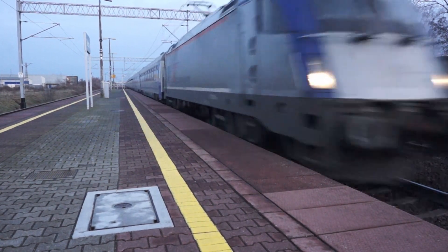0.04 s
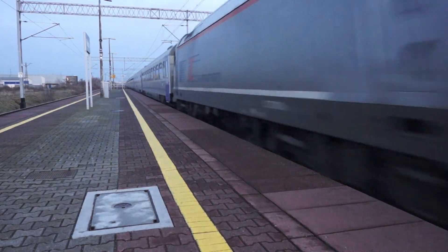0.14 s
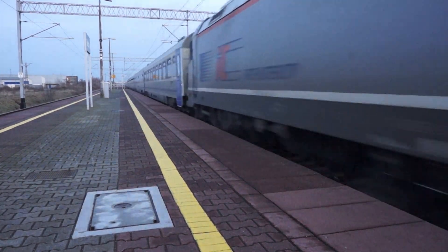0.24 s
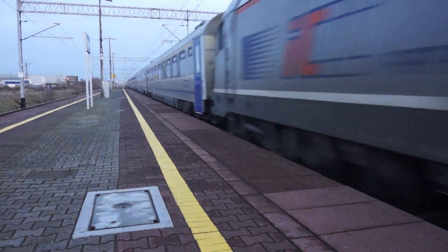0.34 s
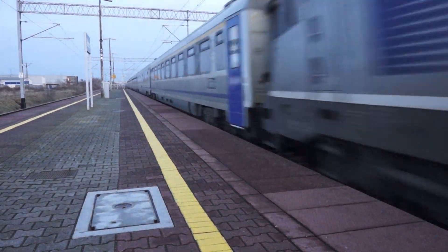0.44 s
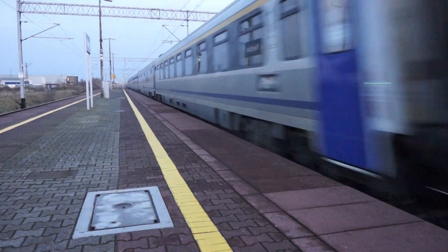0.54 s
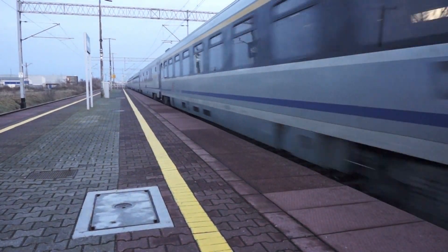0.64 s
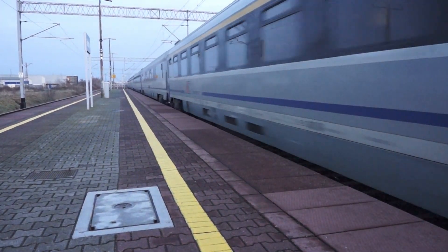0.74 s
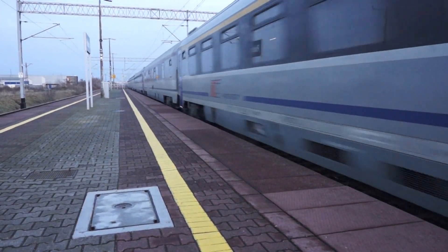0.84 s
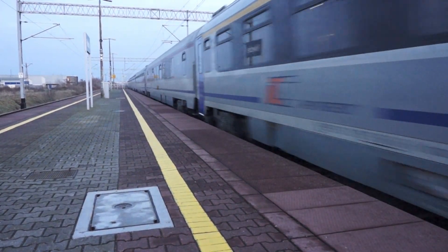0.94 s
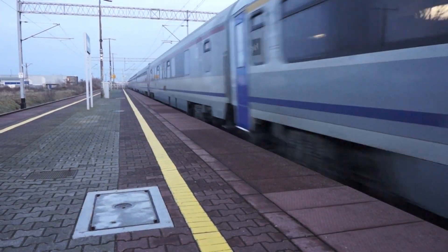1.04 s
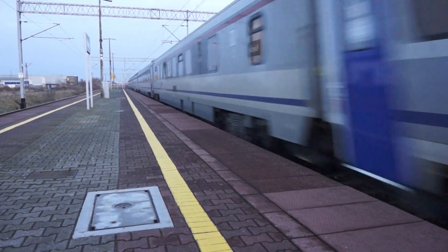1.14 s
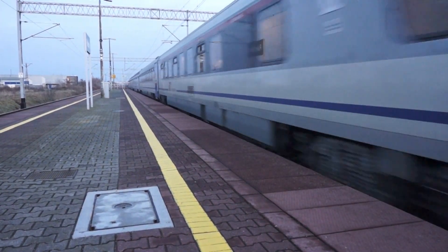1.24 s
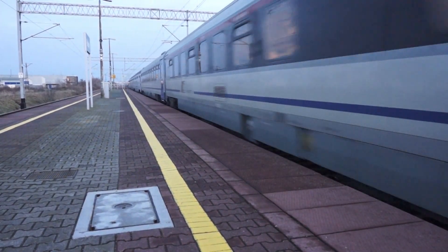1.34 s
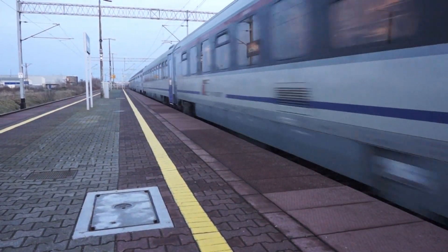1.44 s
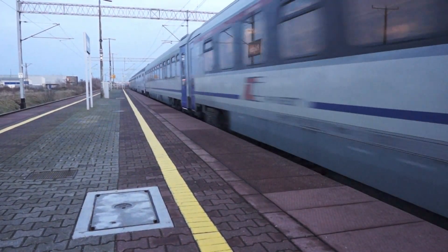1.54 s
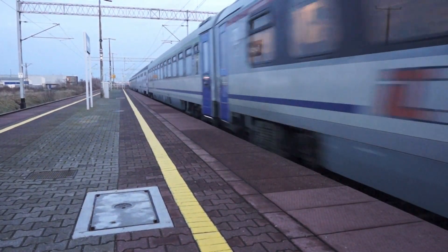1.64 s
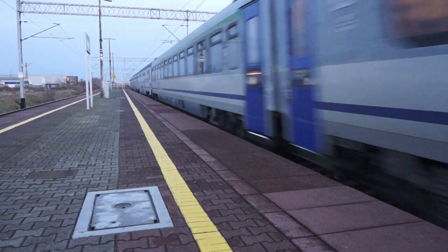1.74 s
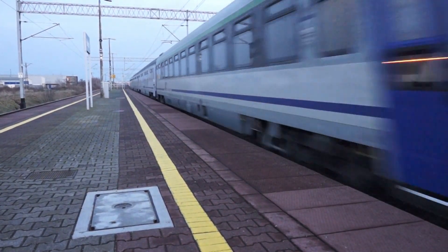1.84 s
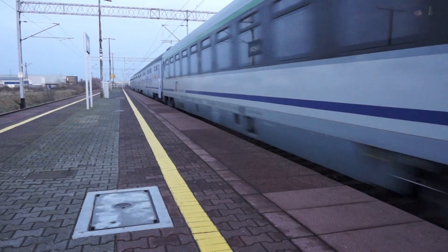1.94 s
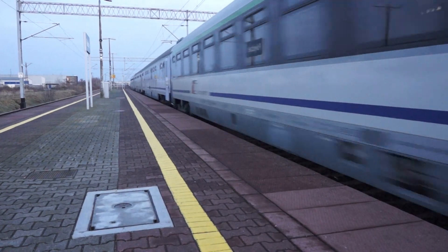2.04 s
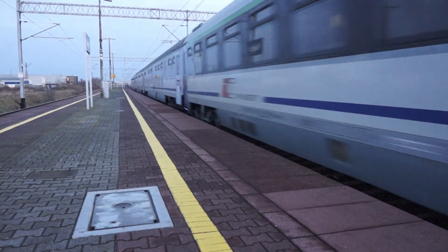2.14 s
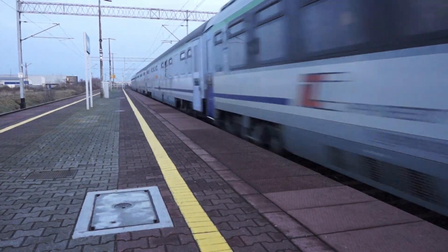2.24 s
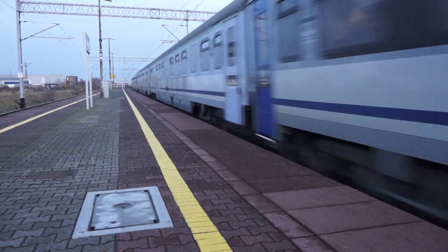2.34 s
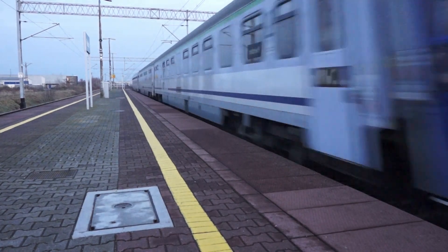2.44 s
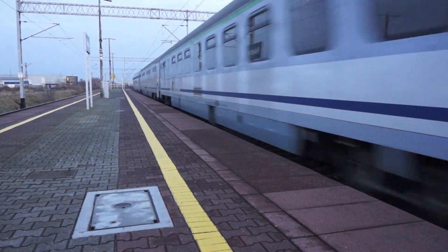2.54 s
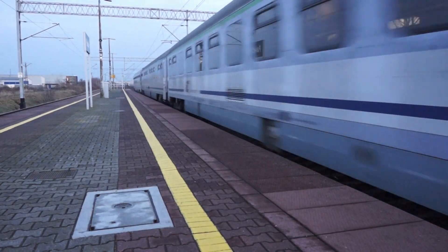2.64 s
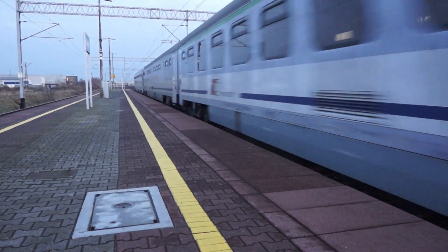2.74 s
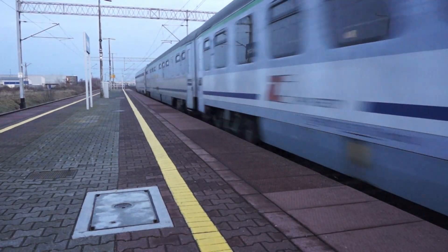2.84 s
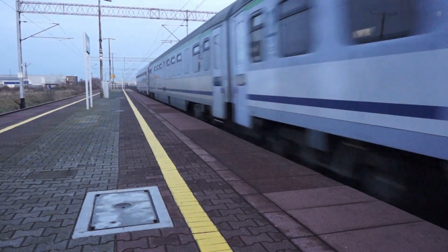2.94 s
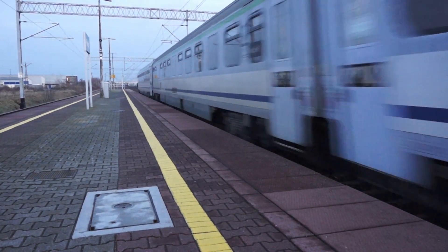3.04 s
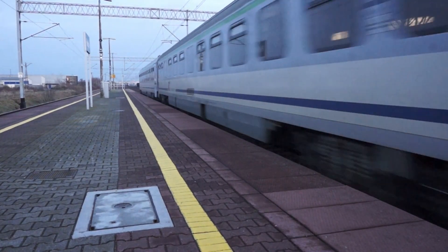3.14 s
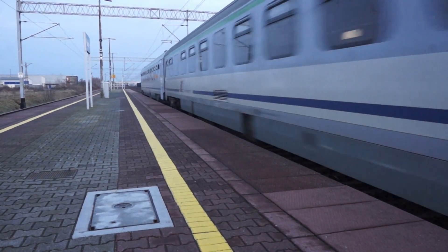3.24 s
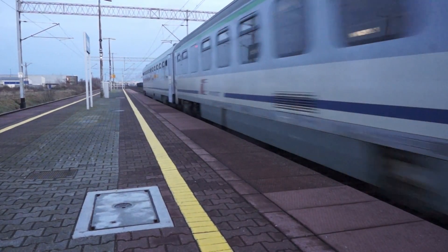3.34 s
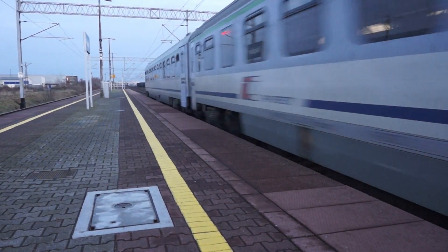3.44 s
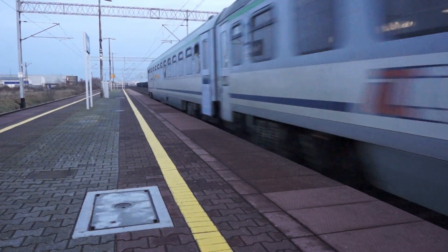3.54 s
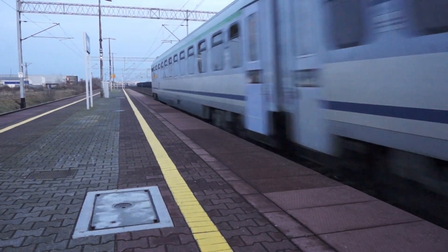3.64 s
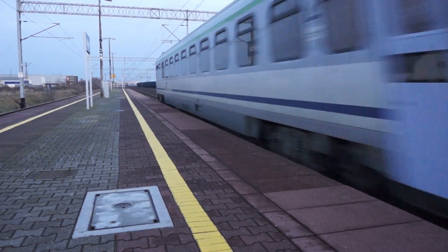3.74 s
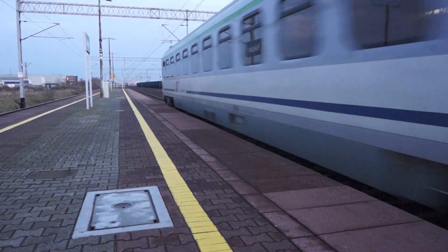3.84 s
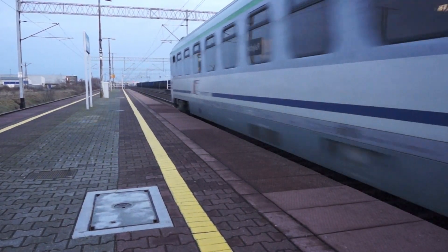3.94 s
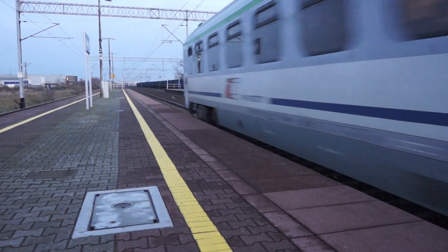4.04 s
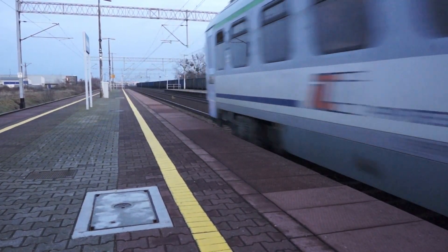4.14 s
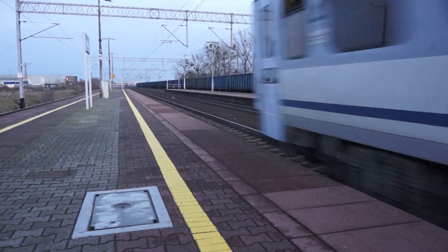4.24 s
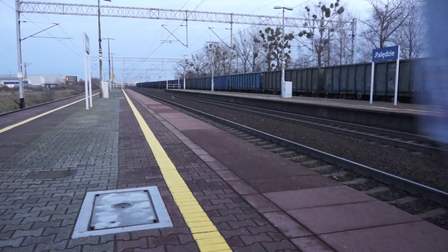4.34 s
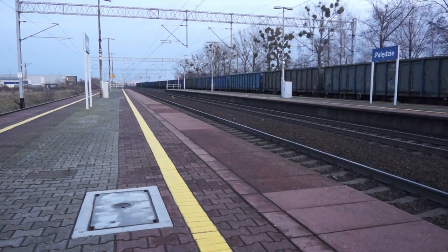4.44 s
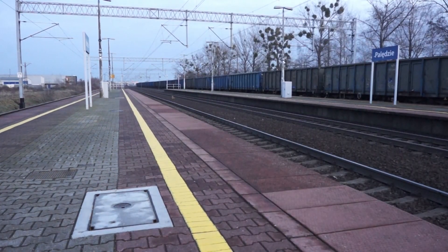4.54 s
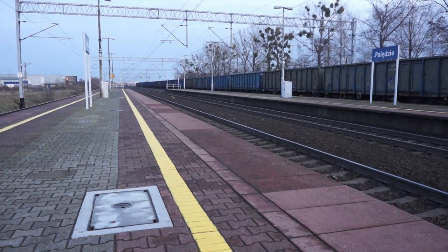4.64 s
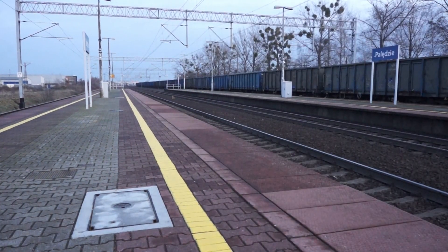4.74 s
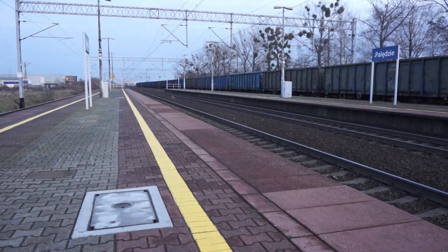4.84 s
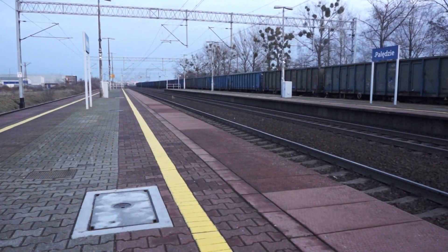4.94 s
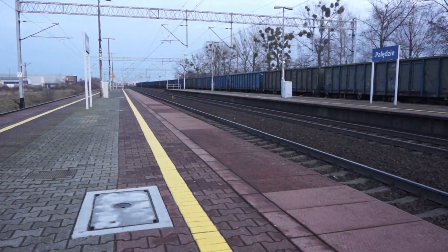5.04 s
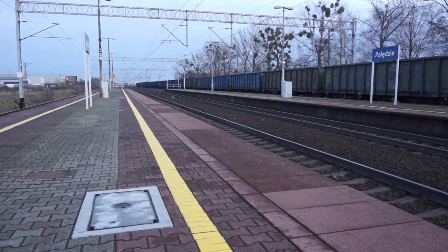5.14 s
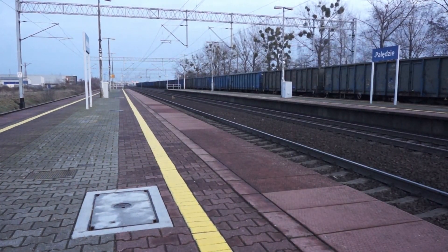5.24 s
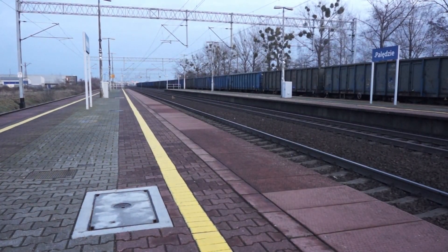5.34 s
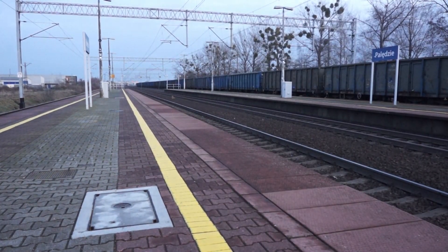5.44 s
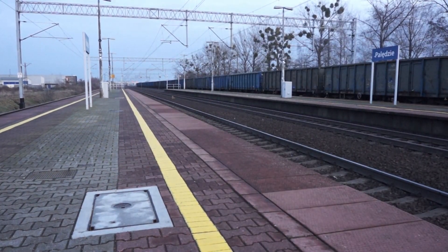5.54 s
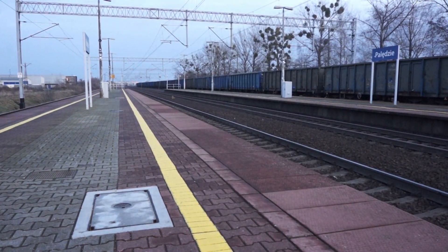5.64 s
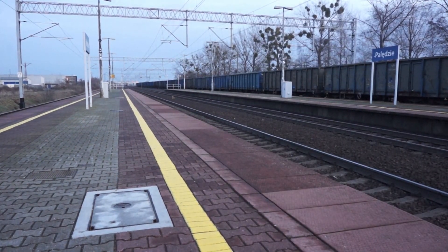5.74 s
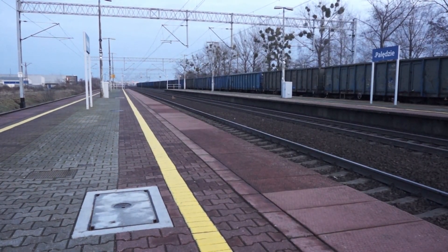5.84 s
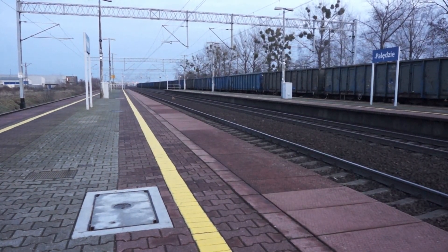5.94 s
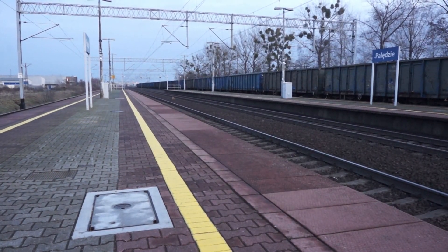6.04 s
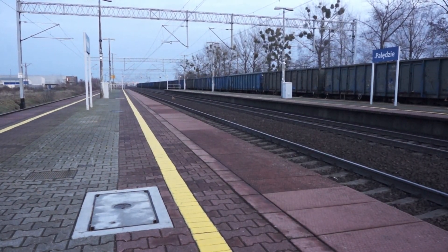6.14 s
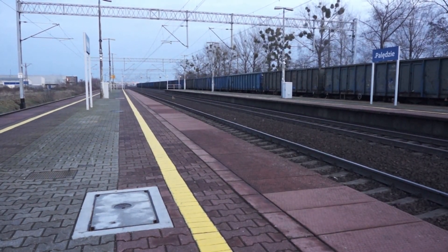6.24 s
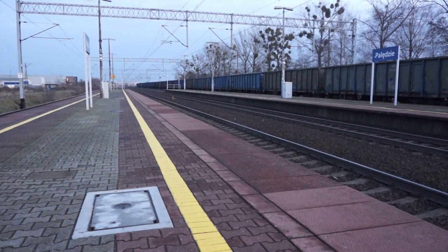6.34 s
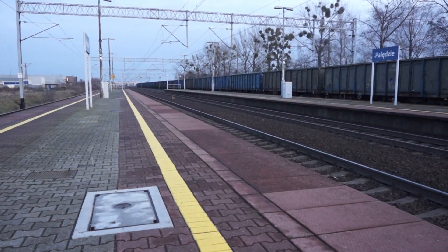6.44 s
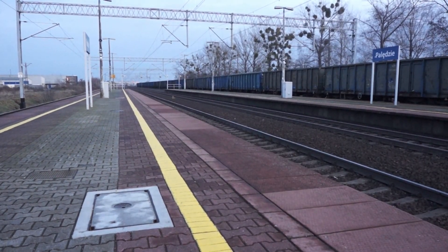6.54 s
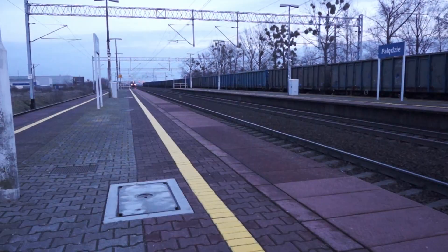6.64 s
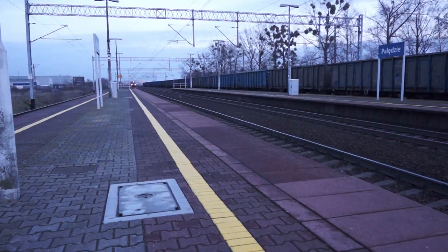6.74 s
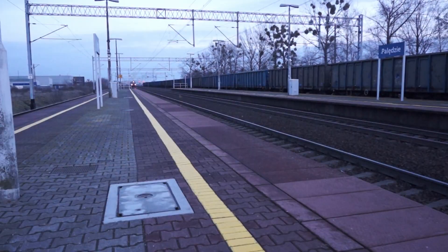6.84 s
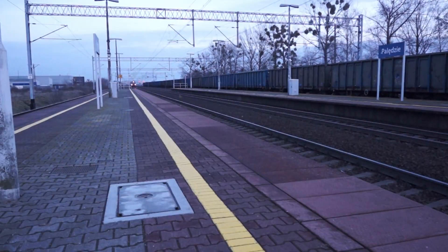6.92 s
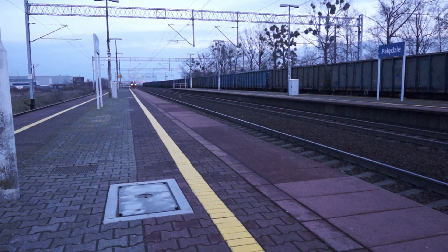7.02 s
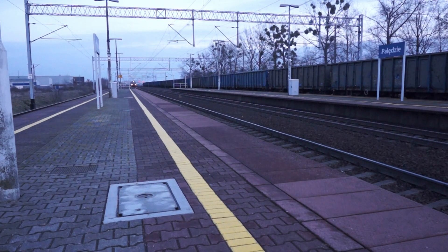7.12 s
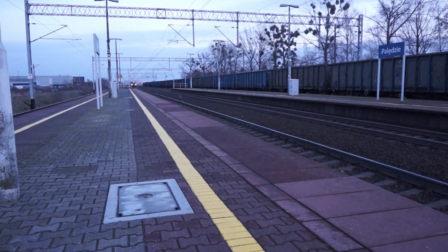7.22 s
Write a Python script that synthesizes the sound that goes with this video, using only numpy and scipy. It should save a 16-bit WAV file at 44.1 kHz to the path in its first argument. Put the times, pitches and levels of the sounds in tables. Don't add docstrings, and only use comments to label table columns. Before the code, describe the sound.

A fast electric passenger train passes very close, on the right of an open-air platform. At 0 seconds the locomotive is already abreast with heavy rumble and broad roar, easing slightly after half a second as the coaches follow. Until about 4.4 seconds the rolling noise surges with each pair of bogies, with hard knocks over rail joints, bright hiss and rough metallic wheel ringing whose pitch drops as it passes; clatter is strongest around 3.1. At 4.5 the last coach clears and slipstream slams the microphone in fluttering thuds. The roar recedes and dulls while the rails sing thinly. Another strong, lumpy gust arrives around 6.3 to 6.4. Near 6.6 the sound dips briefly to silence, then a quiet platform appears: distant traffic wash, light rustling near 6.8 and 7.0, and a last soft low gust until 7.3.

```python
import sys
import numpy as np
from scipy import signal
from scipy.fft import rfft, irfft, next_fast_len
from scipy.io import wavfile

SR = 44100
rng = np.random.default_rng(int(sys.argv[2]) if len(sys.argv) > 2 else 0)


def log_audio(samples):
    frames = np.atleast_2d(samples).T
    limited = np.clip(frames, -1, 1)
    pcm = np.round(limited * 32767).astype(np.int16)
    wavfile.write(sys.argv[1], SR, pcm)


def natural_amplitude(level_db):
    exponent = np.asarray(level_db, float) / 20
    return 10 ** exponent


N = 321048
HZ = np.fft.rfftfreq(N, 1 / SR) + 1e-3
T = np.arange(N) / SR
STEPS = np.arange(0, N + 64, 64) / SR
SPEED_M_S = 42
TAIL_S, CUT_S = 4.5, 6.623


def rms_one(x):
    return x / np.sqrt(np.mean(x ** 2) + 1e-20)


def at_hz(points, hz):
    table_hz, values = np.transpose(points)
    return np.interp(np.log(hz), np.log(table_hz), values)


def drift(rate_hz, size):
    knots = rng.standard_normal(int(size / SR * 60) + 3)
    pole = np.exp(-2 * np.pi * rate_hz / 60)
    wander = rms_one(signal.lfilter([1], [1, -pole], knots))
    return np.interp(np.arange(size) * 60 / SR, np.arange(len(knots)), wander)


def resonate(x, hz, width_hz):
    r = np.exp(-np.pi * width_hz / SR)
    feedback = [1, -2 * r * np.cos(2 * np.pi * hz / SR), r * r]
    return signal.lfilter([(1 - r * r) / 2, 0, (r * r - 1) / 2], feedback, x)


def power_sum(*levels_db):
    power = sum(natural_amplitude(2 * np.asarray(db)) for db in levels_db)
    return 10 * np.log10(power + 1e-12)


def swells(rows):
    levels = []
    for s, db, rise_s, fall_s in rows:
        decay = np.maximum((s - STEPS) / abs(rise_s), (STEPS - s) / abs(fall_s))
        levels.append(db - 20 / np.log(10) * decay)
    return power_sum(*levels)


ZONES_HZ = [100, 450, 1300, 3800, 13000]


def wash(from_s, to_s, levels, colour, alike, balance, lead, patchy_db):
    start = int(from_s * SR)
    size = next_fast_len(int(to_s * SR) - start + 1)
    hz = np.fft.rfftfreq(size, 1 / SR) + 1e-3
    t = (start + np.arange(size)) / SR
    shared, apart = natural_amplitude(at_hz(colour, hz)) * rfft(rng.standard_normal((2, size)))
    likeness = np.clip(at_hz(alike, hz), 0, 1)
    half = natural_amplitude(at_hz(balance, hz) / 2) * np.exp(.5j * at_hz(lead, hz))
    mid = np.sqrt((1 + likeness) / 2) * shared
    side = np.sqrt((1 - likeness) / 2) * apart
    pair = np.array([(mid + side) * half, (mid - side) / half])

    power = 2 * abs(pair.mean(axis=0)) ** 2 / size ** 2
    zone_db = [10 * np.log10(power[(hz > a) & (hz < b)].sum()) for a, b in zip(ZONES_HZ, ZONES_HZ[1:])]
    steer = np.array([np.interp(t, STEPS, db) - own for db, own in zip(levels, zone_db)])
    centres = np.log(np.sqrt(np.multiply(ZONES_HZ[1:], ZONES_HZ[:-1])))
    together, total = drift(8, size), 0
    for octave in np.arange(5, 14.1, .5):
        window = np.cos(np.pi / 2 * np.clip(2 * (np.log2(hz) - octave), -1, 1)) ** 2
        shares = [np.interp(octave * np.log(2), centres, row) for row in np.eye(4)]
        flicker_db = patchy_db * min(1, (16 - octave) / 5) * (.6 * together + drift(9.0, size))
        total = total + natural_amplitude(shares @ steer + flicker_db) * irfft(pair * window, size)
    out = np.zeros((2, start + size + N))
    out[:, start:start + size] = total * (t < to_s)
    return out[:, :N]


# (frequency [Hz], likeness [0-1])
TRAIN_ALIKE = [(60, .9), (250, .93), (700, .96), (1030, .9), (1400, .68), (2070, .42), (2600, .25),
               (3100, .2), (4100, .37), (6200, .3), (9000, .52), (11700, .3), (13000, .05)]
# (frequency [Hz], left minus right [dB])
TRAIN_BALANCE = [(60, -27), (110, 8.5), (200, 0.5), (380, -1.0), (700, -2.5), (1290, -6), (2380, -7.5),
                 (4400, -4.5), (8120, -2.5), (15000, -3.5)]
# (frequency [Hz], left lead [rad])
TRAIN_LEAD = [(30, 0), (2750, 0), (3450, -1.8), (4130, -3.1), (5500, -4.3), (6900, -5.3), (9000, -5.9),
              (15600, -6.6)]


def from_track(x):
    half = natural_amplitude(at_hz(TRAIN_BALANCE, HZ) / 2) * np.exp(.5j * at_hz(TRAIN_LEAD, HZ))
    return irfft(rfft(x) * [half, 1 / half], N)


# (time [s], rail and sleepers [dB], wheel roar [dB], contact hiss [dB])
BOGIE_NOISE = [(0.01, -14.5, -16.5, -18), (0.22, -19, -43, -34), (0.44, -19.5, -19, -21.5),
               (0.57, -25.5, -20, -21.5), (0.68, -65, -23, -29), (0.86, -47, -23.5, -32.5),
               (1.18, -28, -18, -24.5), (1.38, -27, -16, -28), (1.83, -24.5, -16, -23),
               (2.05, -25, -18.5, -25.5), (2.41, -26, -18.5, -25.5), (2.66, -26.5, -23.5, -23.5),
               (3.07, -29.5, -19, -25.5), (3.28, -25.5, -18.5, -24), (3.69, -27.5, -19.5, -23),
               (3.86, -22, -16, -25), (4.02, -34, -27, -53), (4.35, -23, -21.5, -27)]
COMING_M = [4.64, 3.7, 3.56]
GOING_M = [5.1, 4.82, 3.63]
# (time [s], rail [dB], roar [dB])
JOINTS = [(1.16, -22, -16), (1.775, -23, -21), (1.99, -19, -18), (2.14, -21, -47), (2.355, -19, -28),
          (2.415, -21, -40), (2.997, -17, -24), (3.04, -32, -23), (3.135, -13.5, -14), (3.62, -18, -14),
          (3.94, -30, -18), (4.375, -16, -15.5)]
# (time [s], level [dB], rise [s], fall [s])
LOCOMOTIVE = [
    (0.02, -15.5, .1, 0.29),
    (.22, -15.5, 0.059, 0.055),
]
# (time [s], level [dB], rise [s], fall [s])
AIR_PUFFS = [
    (1.17, -35, .02, .05),
    (1.85, -32, 0.11, 0.087),
    (3.31, -32, 0.059, .04),
    (3.66, -31, .03, 0.25),
    (4.03, -26, .02, .07),
]


def rolling_db():
    along = SPEED_M_S * (STEPS - np.array(BOGIE_NOISE)[:, :1])
    rail, roar = [swells([(row[0], row[k], .006, .0077) for row in JOINTS]) for k in (1, 2)]
    knocks_db = (rail, roar, roar - 9)
    zones = []
    for db, coming, going, knocks in zip(np.transpose(BOGIE_NOISE)[1:], COMING_M, GOING_M, knocks_db):
        reach = np.where(along < 0, coming, going)
        loss_db = 10 * .55 * np.log10(1 + abs(along / reach) ** 4.39)
        zones.append(power_sum(knocks, *(db[:, None] - loss_db)))
    rumble = power_sum(zones[0] - 12.5, -38.5, swells(LOCOMOTIVE + AIR_PUFFS))
    return np.array([rumble, *zones]) - .9


def tail_share():
    return np.clip((T - TAIL_S - .015) / .035, 0, 1)


# (frequency [Hz], density [dB per Hz])
ROLLING_COLOUR = [(18, -70), (30, -48), (102, -23.5), (249, -6.5), (590, -4.5), (767, -2), (1200, -7),
                  (1640, -5), (3060, -9), (4530, -12.5), (5730, -11), (8710, -16), (11600, -31),
                  (13600, -46), (15500, -77)]


def passing_train():
    noise = wash(0, TAIL_S + .1, rolling_db(), ROLLING_COLOUR,
                 TRAIN_ALIKE, TRAIN_BALANCE, TRAIN_LEAD, patchy_db=1.6)
    return np.sqrt(1 - tail_share()) * natural_amplitude(-0.5) * noise


# (time [s], disc modes [dB], main ring [dB], rim modes [dB])
BOGIES = [(.58, -46, -33, -52), (.78, -44, -28, -35), (1.20, -48.5, -37, -33), (1.42, -42, -30.5, -37.5),
          (1.85, -47, -27.5, -31.5), (2.03, -28.5, -27.5, -36), (2.43, -29.5, -27, -34),
          (2.62, -39, -31, -55), (3.06, -27.5, -25.5, -34), (3.27, -43, -27, -35), (3.72, -40, -31, -36.5),
          (3.96, -48, -28.5, -37), (4.38, -36, -28, -48)]
# (frequency [Hz], width [Hz])
WHEEL_MODES = [
    (705, 110),
    (1730, 38),
    (2420, 50),
    (2900, 60),
    (3250, 70),
]


def wheels():
    track_m, axles_m, ports_m = 4.2, 2.5, .055
    size = SR * 7 // 10
    out = np.zeros((2, N + SR))
    span = (np.arange(size) - size // 2) / SR
    for s, disc_db, main_db, rim_db in BOGIES:
        mode_db = [disc_db, main_db, disc_db - 4, rim_db, rim_db + .5]
        for offset in (-axles_m / 2, axles_m / 2):
            noise = rng.standard_normal(size)
            detune = 1 + .009 * rng.standard_normal(5)
            ring = np.zeros(size)
            for db, (hz, width_hz), d in zip(mode_db, WHEEL_MODES, detune):
                mode = resonate(resonate(noise, hz * d, width_hz), hz * d, 3 * width_hz)
                ring += natural_amplitude(db + 2 + 1.8 * drift(12, size)) * rms_one(mode)
            along = SPEED_M_S * span + offset
            r = np.hypot(along, track_m)
            facing = np.clip(1.8 + along / 4, 0, 1)
            beamed = ring * facing * (track_m / r) ** .75 * np.hanning(size) ** .35
            at = round(s * SR) - size // 2
            for k, side in enumerate((.5, -.5)):
                path = r - track_m + side * ports_m * along / r
                out[k, at:at + size] += np.interp(span, span + path / 343, beamed)
    roar_db = np.interp(T, STEPS, rolling_db()[2])
    return out[:, :N] * natural_amplitude(.28 * (np.maximum(roar_db, -30) + 21))


# (frequency [Hz], width [Hz], onset [s], level [dB],
# fall [dB/s])
RAIL_SONG = [(810, 100, 4.72, -26, 48), (1602, 53, 4.5, -38.5, 8), (2040, 38, 1.9, -44, 1.5),
             (5280, 90, 5.2, -56, 7), (7590, 250, 4.7, -52, 2.5), (7800, 200, 2.8, -54, 4),
             (8250, 60, 3.2, -64, 8), (9660, 70, 4, -58, 3.3), (1363, 96, 6.67, -44, -4)]


def rail_song():
    t, out = T[T >= TAIL_S], np.zeros(N)
    noise = rng.standard_normal(len(t))
    for hz, width_hz, s, db, fall in RAIL_SONG:
        onset = np.clip((t - s) / 0.01, 0, 1) * ((t < CUT_S) | (s > CUT_S))
        ring = rms_one(resonate(resonate(noise, hz, width_hz), hz, 2 * width_hz))
        level_db = db - fall * np.maximum(t - s, 0) + 2.0 * drift(9.1, len(t))
        out[-len(t):] += onset * ring * natural_amplitude(level_db)
    return out


# (time [s], peak [dB], frequency [Hz], length [cycles])
BUFFETS = [(4.527, 1.5, 524, 0.63), (4.53, -3.5, 1180, 0.8), (4.553, -5, 426, 1.3), (4.579, -3.5, 387, 1.1),
           (4.605, -2.5, 576, 1), (4.669, -9, 824, 1.6), (4.694, -7, 470, 0.95), (5.942, -17, 401, 1),
           (6.04, -8, 450, 0.72), (6.301, -5, 336, 1.3), (6.319, -2, 485, 0.84), (6.335, -6, 434, 2.8),
           (6.345, -9, 280, 0.67), (6.353, -1, 735, 1.2), (6.361, 3, 690, 0.59), (6.371, -4, 570, 1),
           (6.39, -3.5, 444, 1.5), (6.396, 2, 1070, 2.2), (6.406, -2, 820, 0.48), (6.416, 1, 610, 0.9),
           (6.427, 0, 696, 0.79), (6.497, -12.5, 328, 0.67), (6.511, -14, 350, 0.72),
           (7.107, -11.5, 193, 1.4), (7.127, -12, 167, 0.77), (7.149, -14, 167, 0.85),
           (7.194, -16.5, 221, 1.14), (7.241, -11, 164, 0.83), (7.253, -4, 132, 0.91)]


def buffets():
    out = np.zeros((2, N))
    chances = rng.standard_normal((len(BUFFETS), 3))
    for (s, db, hz, cycles), (phase, skew, pan_db) in zip(BUFFETS, chances):
        age = np.arange(int(6 * cycles * SR / hz)) * hz / SR
        shape = natural_amplitude(db - 7.0) * (age / cycles * np.exp(1 - age / cycles)) ** 2
        at = round(s * SR)
        for k, side in enumerate((1, -1)):
            turn = 2 * np.pi * age + 3 * phase + side * 0.51 * skew
            burst = np.sin(turn) + .4 * np.sin(1.55 * turn + skew) + .4 * np.sin(.6 * turn)
            out[k, at:at + len(age)] += (natural_amplitude(side * pan_db) * shape * burst)[:N - at]
    return out


# (time [s], deep eddies [dB], sharp against deep [dB], rise [s], fall [s])
GUSTS = [(4.534, -17.5, 7, 0.024, 0.019), (4.62, -20, -2.5, .03, 0.055), (4.69, -31, -4, .02, 0.043),
         (5.35, -36, 5, .01, 0.015), (5.9, -36, -14, 0.039, 0.081), (6.035, -29, -5, 0.076, 0.062),
         (6.19, -33, 4, 0.057, 0.037), (6.32, -22, -1, 0.063, 0.17), (6.41, -26, 3, 0.046, 0.053),
         (6.52, -36.5, 3.5, 0.038, 0.14), (7.04, -37, -15, 0.016, 0.027), (7.11, -31.5, -10, 0.056, 0.064),
         (7.27, -32, -12, .02, .05)]


def gust_db():
    deep = swells([(s, db, *shape) for s, db, _, *shape in GUSTS])
    sharp = swells([(s, db + sharp_db, *shape) for s, db, sharp_db, *shape in GUSTS])
    return deep, sharp


def eddies(clicks, low_hz, high_hz, q):
    dealt = rng.integers(0, 5, len(clicks))
    total = 0
    for k, hz in enumerate(np.geomspace(low_hz, high_hz, 5)):
        kicks = clicks * (dealt == k) + 1e-18
        total = total + resonate(resonate(kicks, hz, hz / q), hz, hz / q)
    return rms_one(total)


def wind():
    start = int(TAIL_S * SR)
    t, out = T[start:], np.zeros((2, N))
    deep_db, sharp_db = [np.interp(t, STEPS, db) for db in gust_db()]
    shape = (3, len(t))
    struck = rng.random(shape) < 500 / SR
    strength = natural_amplitude(3.1 * np.minimum(rng.exponential(1, shape), 4))
    kicks = struck * strength * rng.choice([-1, 1], shape)
    lows = [natural_amplitude(deep_db) * eddies(k, 130, 480, q=1.4) for k in kicks]
    highs = [natural_amplitude(sharp_db - 6) * eddies(k, 500, 1500, q=1.6) for k in kicks]
    for port in (1, 2):
        low = natural_amplitude(-2.5) * (0.64 * lows[0] + 0.48 * lows[port])
        high = natural_amplitude(-0.5) * (0.44 * highs[0] + 0.38 * highs[port])
        out[port - 1, start:] = low + high
    return out


GUST_BODY_DB = [-2, -5.5, -34]
TAIL_DB = [-30, -26, -24, -30.5]
DOUBLING_DB = [5.9, 5, 3.67, 8.25]
LAND_DB = [-50, -55, -48.5, -77]


def receding_db():
    clear_m = 6.9
    doublings = np.log2(1 + SPEED_M_S * np.maximum(STEPS - TAIL_S, 0) / clear_m)
    deep, sharp = gust_db()
    air = [deep + GUST_BODY_DB[0], sharp + GUST_BODY_DB[1], sharp + GUST_BODY_DB[2], -99]
    rows = zip(TAIL_DB, DOUBLING_DB, LAND_DB, air)
    return np.array([power_sum(db - loss * doublings, land, gust) for db, loss, land, gust in rows])


# (frequency [Hz], density [dB per Hz])
RECEDING_COLOUR = [(18, -86), (30, -55), (177, -27), (219, -18.5), (249, -17), (332, -16.5), (673, -11.5),
                   (787, -11), (1260, -11), (1640, -8.5), (1770, -10.5), (3980, -21.5), (7640, -24.5),
                   (9670, -28.5), (15500, -79)]


def receding_train():
    noise = wash(TAIL_S, CUT_S, receding_db(), RECEDING_COLOUR,
                 TRAIN_ALIKE, TRAIN_BALANCE, TRAIN_LEAD, patchy_db=1.5)
    return np.sqrt(tail_share()) * natural_amplitude(-1.5) * noise


QUIET_DB = [-48, -37.5, -41, -52]
# (time [s], level [dB], rise [s], fall [s])
RUSTLES = [
    (6.66, -36, 0.033, 0.015),
    (6.77, -31, 0.062, 0.088),
    (6.84, -34.5, 0.036, .015),
    (7.04, -33.5, 0.12, 0.14),
]


def quiet_db():
    rustle = swells(RUSTLES)
    added = [gust_db()[0] + GUST_BODY_DB[0], -99 + 0 * STEPS, rustle - 16, rustle]
    return np.array([power_sum(db, more) for db, more in zip(QUIET_DB, added)])


# (frequency [Hz], density [dB per Hz])
QUIET_COLOUR = [(18, -61), (30, -33), (315, -11), (350, -14), (409, -10), (454, -8), (532, -6.5), (747, -3),
                (1440, 1.5), (1640, 4), (7070, -2), (10200, -7), (15500, -37)]
# (frequency [Hz], likeness [0-1])
QUIET_ALIKE = [(60, 0.89), (130, 0.97), (290, 0.99), (640, 0.95), (1410, 0.88), (3100, 0.76), (6820, 0.64),
               (15000, 0.5)]
# (frequency [Hz], left minus right [dB])
QUIET_BALANCE = [(60, 2), (110, 0.0), (200, 1), (380, -0.5), (700, -0.5), (1290, 2.5), (2380, 0.0),
                 (4400, -0.75), (8120, -4), (15000, -1.5)]


def quiet_platform():
    return wash(CUT_S, N / SR, quiet_db(), QUIET_COLOUR,
                QUIET_ALIKE, QUIET_BALANCE, [(30, 0), (16000, 0)], patchy_db=.8)


def scene():
    track = passing_train() + from_track(wheels() + rail_song()) + receding_train()
    wind_filter = signal.butter(2, 105, "high", fs=SR, output="sos")
    slipstream = signal.sosfilt(wind_filter, buffets() + wind())
    return track + slipstream + quiet_platform()


def low_pass(x):
    return signal.sosfilt(signal.butter(12, 15630, fs=SR, output="sos"), x)


# (time [s], gain [0-1])
FADE = [(0, 1), (6.59, 1), (6.605, .4), (6.616, 0), (6.63, 0), (6.65, .5), (6.68, 1), (7.3, 1)]
# (time [s], depth [dB re 9.5 dB], rise [s], fall [s])
LEVEL_DIP = [
    (.313, 1.1, .012, 0.0083),
]


def record(dry):
    dip_gain = np.interp(T, STEPS, natural_amplitude(-natural_amplitude(swells(LEVEL_DIP)) * 9.5))
    faded = dry * np.interp(T, *np.transpose(FADE)) * dip_gain
    rounded = 1.4 * np.tanh(faded / 1.4)
    return low_pass(rounded)


dry = scene()
out = record(dry)
log_audio(out)
```